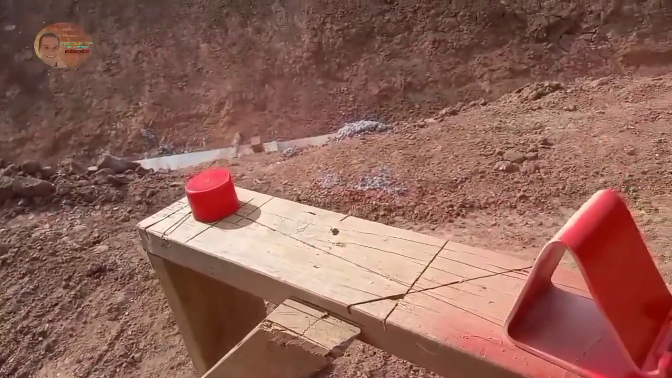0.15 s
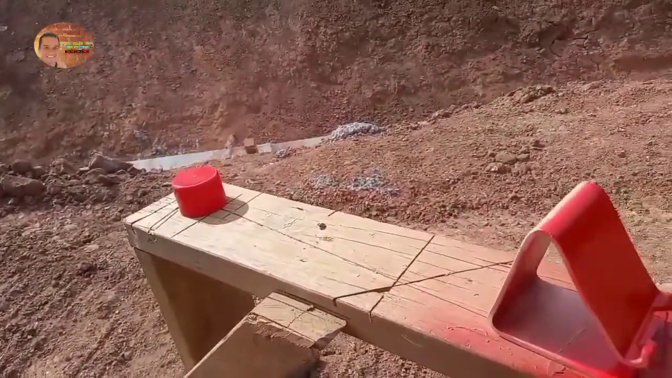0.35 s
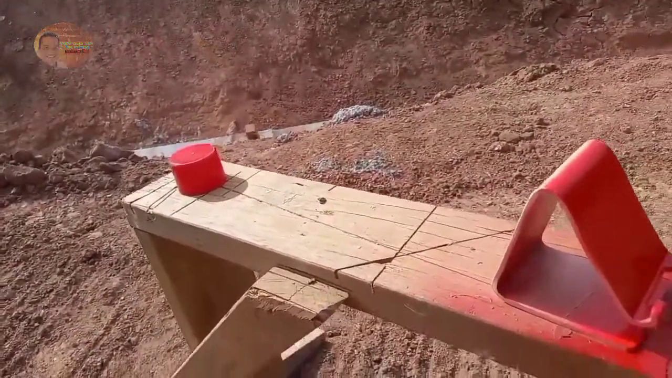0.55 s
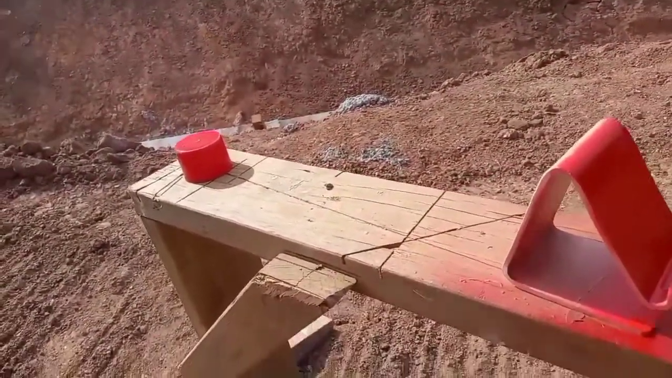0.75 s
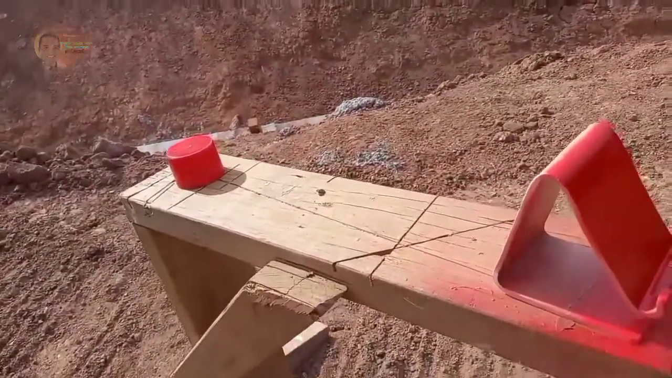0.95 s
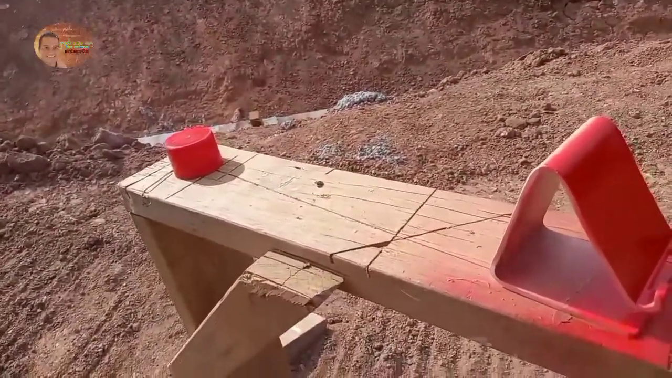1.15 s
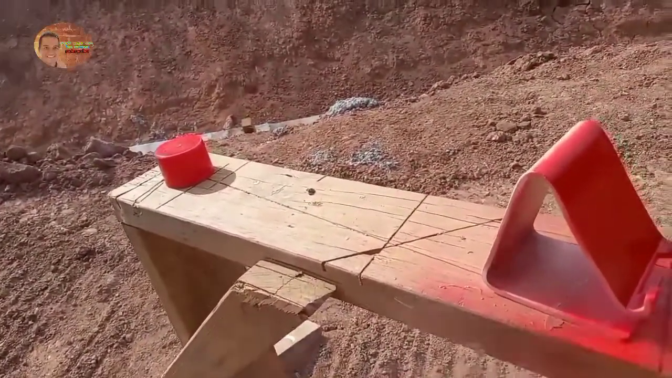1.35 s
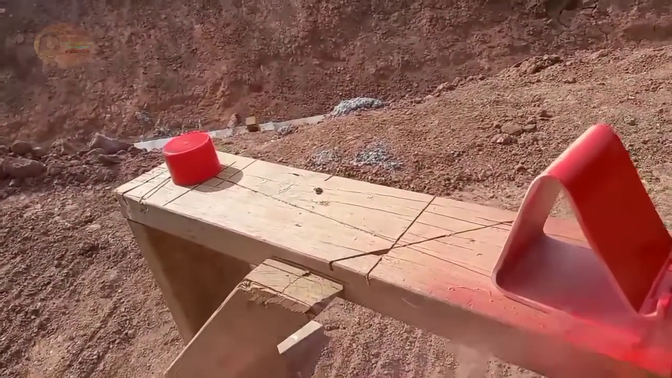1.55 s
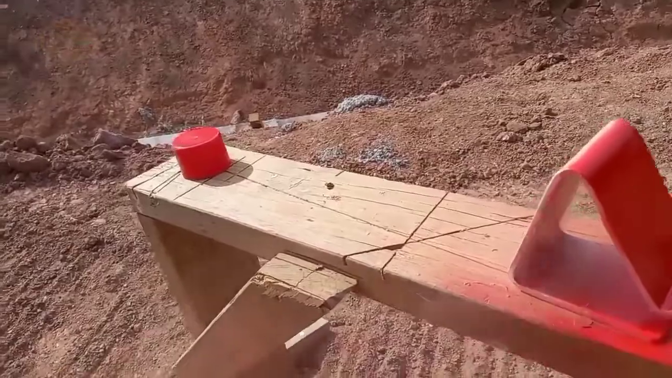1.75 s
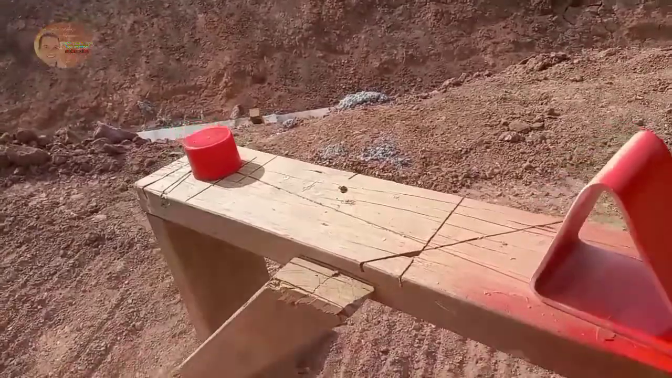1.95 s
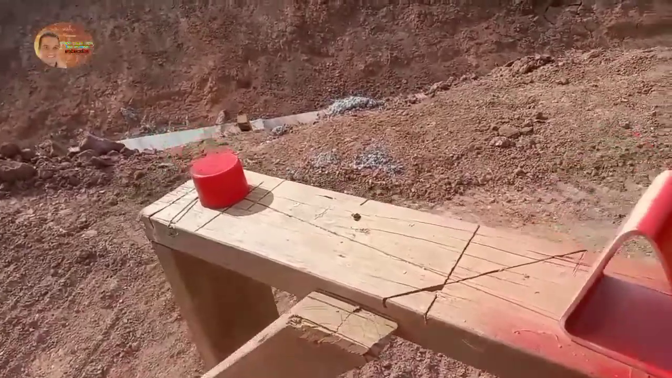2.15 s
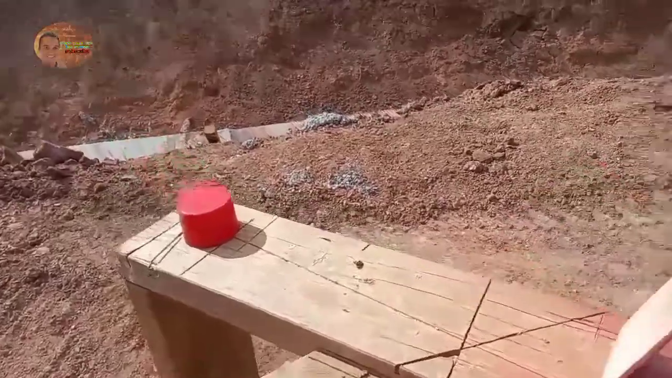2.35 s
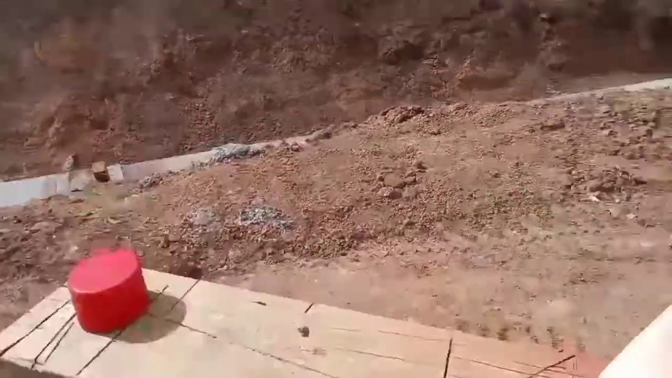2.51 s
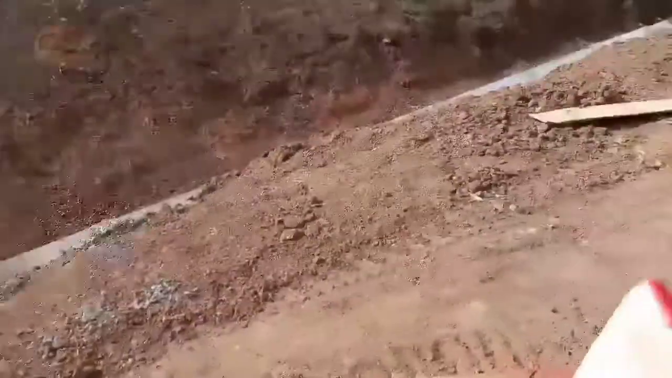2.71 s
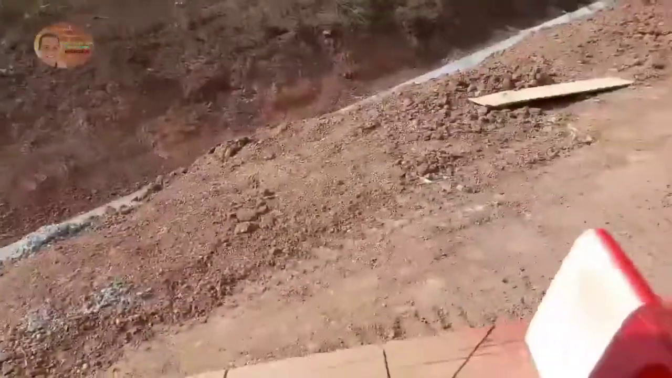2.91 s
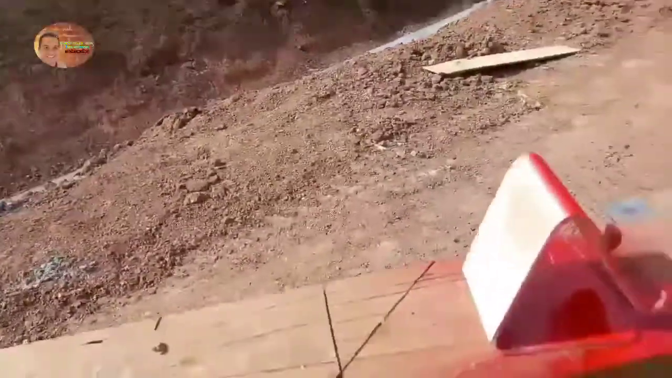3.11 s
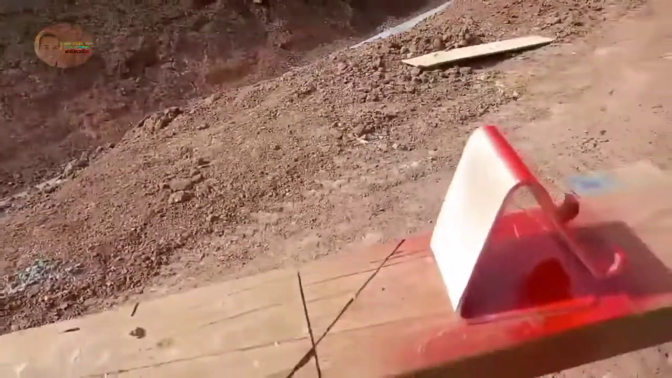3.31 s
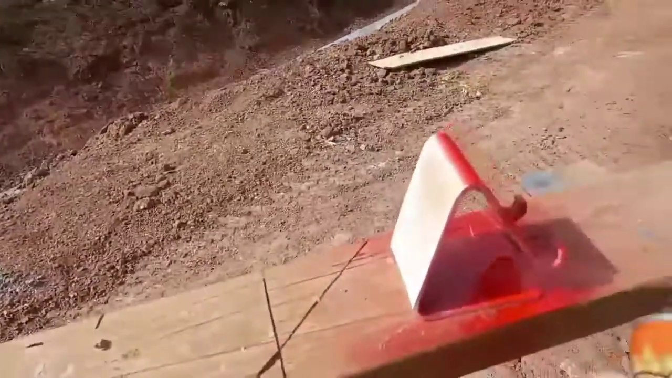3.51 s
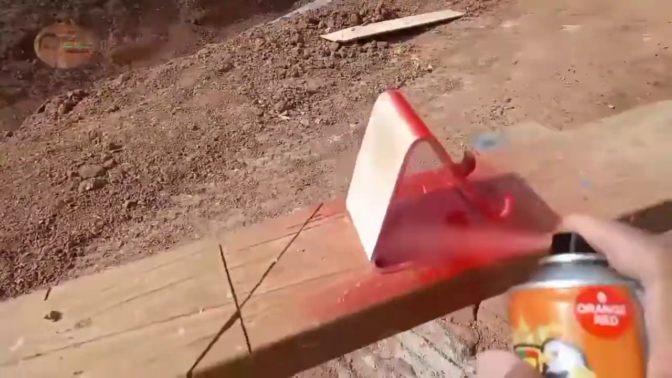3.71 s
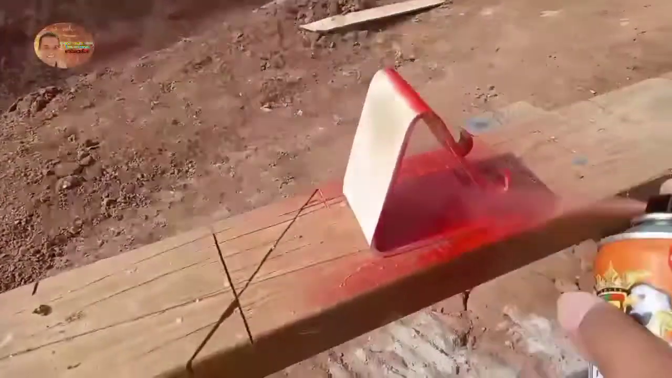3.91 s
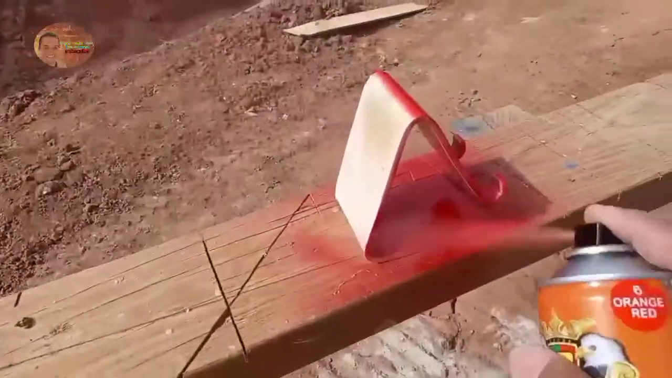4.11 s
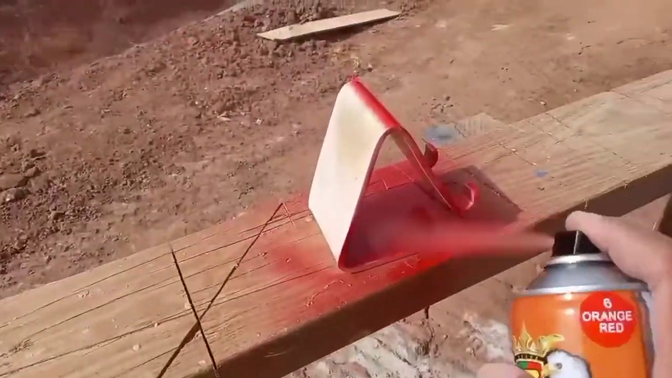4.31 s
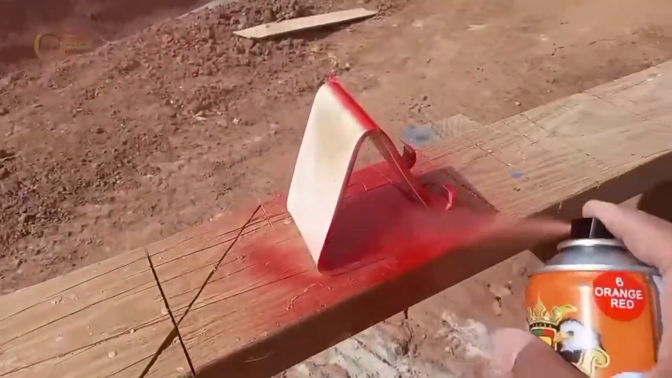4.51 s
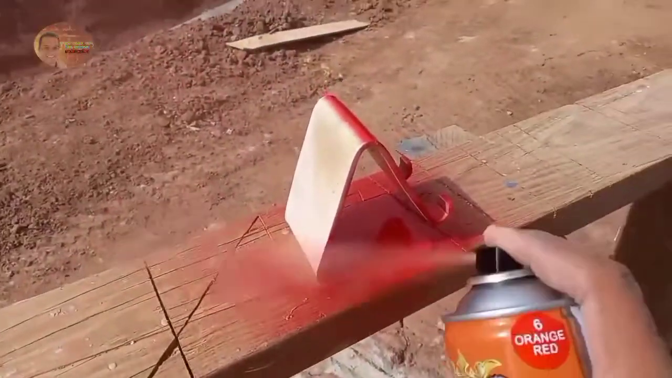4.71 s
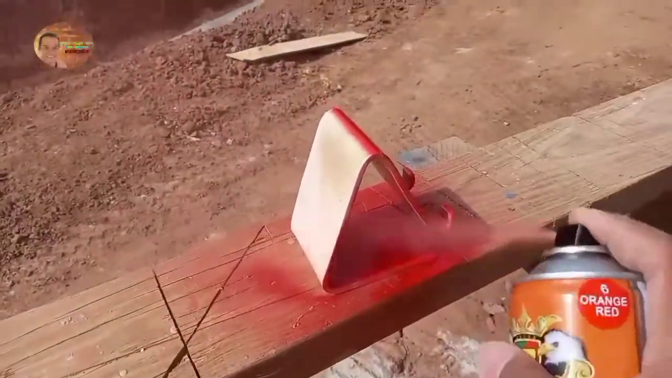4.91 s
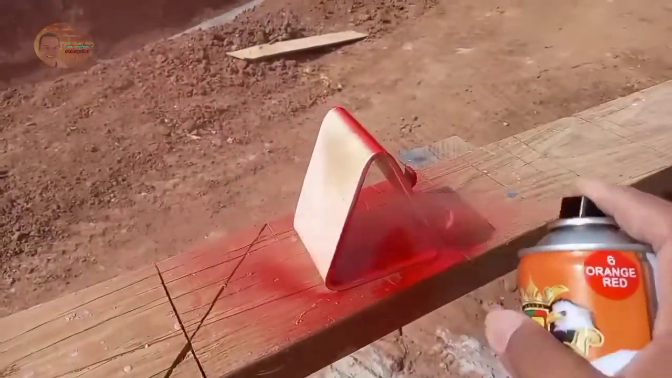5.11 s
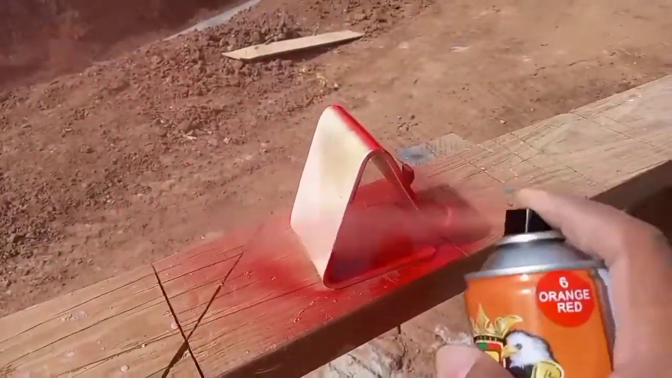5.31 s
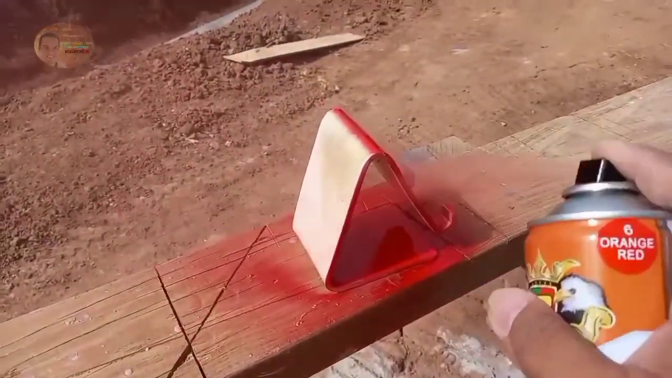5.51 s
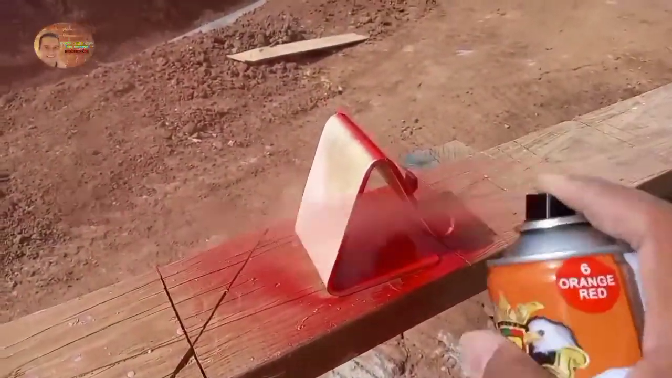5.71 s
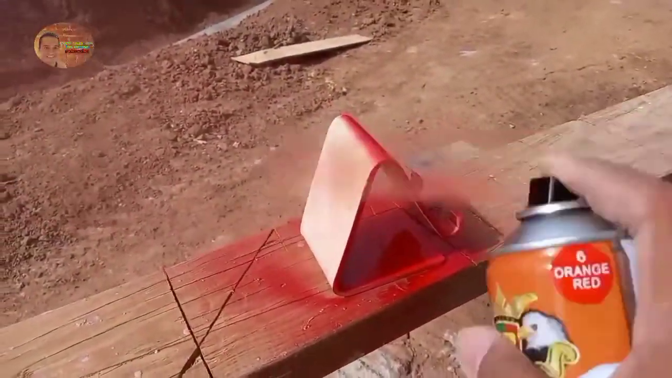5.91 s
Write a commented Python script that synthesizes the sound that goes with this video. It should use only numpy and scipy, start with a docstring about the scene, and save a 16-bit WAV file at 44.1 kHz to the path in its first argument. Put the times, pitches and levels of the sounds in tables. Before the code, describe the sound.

An aerosol can hisses, stops while its mixing ball rattles and wind bumps the microphone, then hisses again in rhythmic sweeps outdoors.

```python
"""An aerosol can hisses over a bent metal piece on a plank outdoors, stops, and sprays again from a new side.
The hiss is shaped noise at the nozzle; a second, lower noise is the jet rushing on the piece.
The mixing ball strikes ringing modes of the can wall, and bending sines make the paint glug.
Crumbling noise is the painter stepping round on dry soil, mostly between the passes.
Wind bumps the two microphones of a hand-held camera, over a faint open-air background."""
import sys
import numpy as np
from scipy import signal
from scipy.fft import rfft, irfft, next_fast_len
from scipy.io import wavfile
from scipy.ndimage import uniform_filter1d, map_coordinates

SR = 44100
rng = np.random.default_rng(int(sys.argv[2]) if len(sys.argv) > 2 else 0)


def int16_out(signal):
    """Quantize to a 16-bit WAV file."""
    q = np.round(np.clip(np.atleast_2d(signal).T, -1, 1) * 32767)
    wavfile.write(sys.argv[1], SR, q.astype(np.int16))


N = 262836

# Colour of the nozzle hiss. Each row: frequency in Hz, relative density in dB per Hz.
NOZZLE_COLOUR = [(1500, -23), (3000, -11.5), (5000, -3.5), (8000, 0.5), (10500, 1.5), (12000, 3),
                 (14000, 3), (15300, 3.5)]
# Colour of the jet on the piece, one list for each pass. Each row: frequency in Hz, relative density in dB per Hz.
SPLASH_COLOURS = [
    [(150, -20), (400, -10.5), (800, -10), (1000, -16), (1400, -8), (1800, -11), (2250, -4), (2800, -7.5),
     (3300, -13), (6000, -9.5), (9000, -13.5)],
    [(150, -15.5), (350, -5), (800, -2.5), (1050, -4), (1400, -0.5), (2500, 3), (2900, -2), (4500, -0.5),
     (6500, -4), (9000, -27.5)],
]
# The camera body shades the nozzle's treble, one list for each pass. Each row: frequency in Hz, L-R in dB.
CAMERA_SHADE = [
    [(3000, 3.5), (9000, 0), (11500, -3.5), (13200, -7), (15200, -3)],
    [(3000, 2.5), (10500, -2), (12500, 3), (14000, 1), (15300, -6)],
]
# The valve is held open. Each row: opens in seconds, shuts in seconds, nozzle level in dB at first and at last,
# level of the jet on the piece in dB at first and at last, nozzle L-R in dB, jet L-R in dB.
PASSES = [(0.63, 1.861, -31.5, -32.5, -41, -40.5, -0.5, -6.5),
          (3.468, 6.198, -34, -31, -42.5, -39, 1.5, -2.5)]
# At each turn of the hand the jet leaves the piece and the can swings aside.
# Each row: time in seconds, half length in seconds, loss of the jet in dB, swing L-R in dB.
HAND_TURNS = [(1.165, 0.078, 8, -1.5), (1.52, 0.07, 5.5, -3.5), (1.743, 0.036, 6, -3.5),
              (3.766, 0.045, 4.5, 0.5), (4.053, 0.042, 7, 1), (4.38, 0.05, 7, 1), (4.718, 0.051, 9.5, 0),
              (5.031, 0.07, 7, 3.5), (5.346, 0.039, 6.5, 3.5), (5.652, 0.032, 10, 0)]
# The valve whistles as it shuts. Each row: time in seconds, pitch in Hz, peak level in dB.
VALVE_SQUEAK = [(1.893, 15600, -75), (1.9, 14000, -66), (1.91, 11500, -71), (1.922, 9300, -84)]
# Where the can is at each end of a sweep or step. Each row: time in seconds, lag of the left microphone in ms.
LEFT_LAG = [(0, 0.43), (0.625, 0.313), (0.87, 0.275), (1.07, 0.324), (1.25, 0.269), (1.435, 0.319),
            (1.57, 0.272), (1.725, 0.319), (1.9, 0.274), (2.85, 0.27), (3.05, 0.13), (3.55, 0.192),
            (3.765, 0.088), (3.94, 0.168), (4.085, 0.086), (4.245, 0.154), (4.4, 0.048), (4.56, 0.111),
            (4.715, 0.004), (4.885, 0.122), (5.035, 0.026), (5.2, 0.122), (5.335, 0.04), (5.505, 0.113),
            (5.655, 0.008), (5.83, 0.086), (6.0, 0.036)]
# Stereo match before the lag. Each row: frequency in Hz, left-right likeness (1 is identical).
LIKENESS = [(100, 1), (600, 0.42), (1500, 0.84), (2300, 0.5), (3500, 0.98), (6000, 0.7), (8500, 1),
            (12000, 0.34), (15000, 0.55)]
# Blows of the mixing ball. Each row: time in seconds, level in dB over 5 ms of the modes at 3-5.3 kHz,
# then in dB against it the modes under 1.7 kHz, at 1.7-3 kHz, at 5.3-8 kHz, above 8 kHz; last, L-R in dB.
BALL_KNOCKS = [(0.1354, -61.5, -23, -9, 6, -3, -10.5), (0.2123, -68.5, -11.0, -8, 4, -4, -8.0),
               (1.2061, -41, -2.5, 5, -11, -5, -5), (1.208, -39, -2.5, -1.5, 3, 3, -10.5),
               (1.231, -46, -2, 2, 7, 8, -2.0), (1.2414, -48, -7, -6.0, 3, 5.0, -16),
               (1.2751, -37.5, -14, -13, 0, 2, -20), (1.2856, -30, -10, -5, 0, -4, -13),
               (1.2886, -30.5, 2, 1, 5, 5, -2.5), (1.2928, -50, -15, -13, 12, 8, 22),
               (1.6215, -33.5, 8.5, -3, -5, -14, -6), (1.624, -26, -18, -4, 2, 2.5, -5),
               (1.635, -30.5, -11, -6, 6, 2, -5), (1.6383, -39, -15.0, -2, 8, -4, -2),
               (1.6463, -36, 1, -8, -6, 5, -3), (1.709, -58, 17.5, 0, 0, 0, -8),
               (1.742, -63, 12, 0, 0, 0, -6), (1.771, -55.5, 21, 2, 0, 0, 2),
               (1.794, -68, 21, -5, -2, 0, -14), (2.2838, -68.5, 2, -3, 11, -6.0, 11),
               (2.344, -38, -2, -1.5, -1, -6, -4.5), (2.3854, -52.5, 6, 2, 0, -9, -13),
               (2.4149, -51, -4, 2.5, -1, -5, -8), (2.441, -53.5, -17, 4, 0, -12, -9),
               (2.4455, -48, -8.0, -7, -3.0, -15, -2), (2.455, -59, -12, 2, -4, -12, -11),
               (2.4996, -27, -21, -10, 1.5, -6, -9.5), (2.5038, -42.5, -15, 1, 5, -4, -21.5),
               (2.535, -49.5, 5, 2, -5, 1, -10), (2.563, -59.5, 5, 7.5, -1, -1, -16),
               (2.5845, -50, 2, -5, -7.0, -12.0, -6.0), (2.589, -48.5, -13, -0.5, 5.5, 1.5, -12),
               (2.65, -51.5, -15, -16, -1.0, -3, -14), (2.7346, -37.5, -1.5, -8, 11, 1.5, -12),
               (2.7601, -56.0, -17, -19.0, -3.0, -2, -5.0), (2.8136, -42.5, -2, -5, -4.0, -2, -4),
               (2.8158, -37.5, -10, -12, -1, -3, -9.5), (2.8765, -32, -9, -8, 7.5, 1.5, -9),
               (2.8779, -40.5, -3, -8, 12.5, -4.0, 8), (2.896, -51.0, 2, -1, 0, 8, -8.0),
               (2.92, -51, -12, -5, 2, 4, -3), (2.925, -49, 1, 11, -7.0, 0, -1),
               (2.931, -43.5, -13.0, -12, 4, 1, -8), (3.0115, -42, -15, -2, 1.5, -2, -2),
               (3.031, -57, -14, -6, -1, -8, 9), (3.037, -70, 20, 19, -5.0, -5.0, -3),
               (3.081, -76, 10, 8, -2, -5, -3), (3.102, -38.5, -9, -15, 11, -6, -6),
               (3.115, -60, 5, 5, -8, -8, 8), (3.1172, -39.5, -16, -9, 1, -4, -4),
               (3.1395, -51, 2, -7, -7, 0, -7), (3.148, -43, -21, -22, 3.5, -6, -4),
               (3.1588, -49, -3, -4, 0, -6, -2), (3.1746, -39, -23, -12, 1, -6, -3),
               (3.1908, -51, -9, -1, -14.0, -8.0, -1), (3.196, -47.0, -19, -4, -1, 0, -11),
               (3.2034, -45.5, -24, -6, 3, 4, -4), (3.2188, -55, -1, -5, -4, -6, -12),
               (3.231, -49.5, -20, -4, 1, -9.0, 1), (3.2384, -56, -11, -6, 2, -8, 0),
               (3.2475, -58, -3, -5, -3, -6, -1), (3.2753, -54, -16.0, -8, 4, -11.0, 4),
               (3.339, -51.5, -7.5, -1, 10.5, 0, -4), (3.3514, -58, 9, 0.5, -11, -8.0, -16),
               (3.366, -58.5, 5, 2, -8.0, 0.0, 16), (3.401, -57, -4, -2, -2, -5.0, 18),
               (3.41, -59, -16, 6, -5, 5, -6), (4.0484, -40.5, -6, -7, 0, -5, -7),
               (4.4309, -37, -11, -12, -1, -15, 0.0), (4.9977, -32.5, -20, -7.5, -0.5, -3, 4),
               (5.0377, -33.5, -11, -2, -5, 2, -1), (5.2085, -29.5, -32, -9, -4.5, -7, 2.5),
               (5.3411, -30.5, -5, -3, 3, 3, 1), (5.529, -28.5, -14, -9, 1.5, -5, -2),
               (5.6552, -31, -8.5, -2, 6.5, 1.5, 0.0), (5.8919, -37, -6.5, -1, 2.5, -11, 0.0)]
# Modes of the paint-damped can wall, in the groups above. Each row: centre in Hz, width in Hz, relative level in dB.
CAN_MODES = [
    [(3900, 1340, 1), (5090, 800, 2)],
    [(850, 79, 2), (1246, 113, 2), (1610, 410, 3)],
    [(2035, 320, 6), (2680, 650, 7)],
    [(5580, 280, 4), (6970, 1240, 3.5)],
    [(9840, 1600, -1.5), (12700, 1400, -5.5), (13600, 4500, -15)],
]
# Paint bubbles in the tipping can. Each row: start in seconds, length in seconds, first, middle and last pitch
# in Hz, level in dB at the middle.
PAINT_GLUGS = [(1.51, .03, 1230, 1330, 1240, -55), (1.768, .062, 1400, 1130, 1320, -50),
               (1.95, .035, 1330, 1300, 1340, -62)]
# A sole shifts on the soil. Each row: start in seconds, length in seconds, low level in dB, grit level in dB.
SOLE_SCUFFS = [(0, 0.021, -65, -58.5), (1.495, .035, -47, -80), (1.732, 0.11, -46.5, -80),
               (1.88, 0.093, -54, -75), (2.004, 0.051, -68.5, -84), (2.142, 0.12, -61, -86),
               (2.326, 0.063, -49.5, -54.5), (2.434, 0.059, -56, -62), (2.509, 0.16, -56.5, -59.5),
               (2.723, 0.12, -54.5, -62), (2.934, 0.017, -40.5, -46), (2.966, 0.012, -43, -47),
               (3.002, 0.005, -69, -64), (3.026, 0.014, -68, -73), (3.11, 0.17, -61, -59.5),
               (3.345, 0.028, -58.5, -55), (3.387, 0.04, -60.5, -55.5), (3.46, 0.035, -57, -59),
               (3.489, 0.15, -52.5, -50)]
# Colour of the low band of a scuff. Each row: frequency in Hz, relative density in dB per Hz.
SOLE_COLOUR = [(150, -22), (350, -12), (600, -11), (810, -1), (1030, -10), (1380, 0), (1600, -3),
               (1850, -13), (2150, -8), (2600, -15), (4000, -27)]
# The breeze on the ports. Each row: time in seconds, buffet level in dB, L-R in dB.
BREEZE = [(0, -66, -1), (.3, -68, -1), (.85, -60, -1), (1.4, -58, 0.5), (1.55, -56, -31), (1.66, -40, -10),
          (1.72, -37, -7), (1.8, -34.5, -6), (1.85, -33.5, 8), (1.95, -35, -2), (2.1, -41, -6),
          (2.18, -48.5, -6), (2.28, -34, -6), (2.42, -40, 3), (2.55, -32, -5), (2.68, -42, 0),
          (2.88, -63.5, 1), (3.25, -65, -2), (4.55, -60.5, 2.5), (4.72, -45, -7), (4.95, -61, -2),
          (5.45, -62, 0), (5.72, -53.5, -13), (5.8, -53, -23), (5.96, -58, -12)]
# Colour of the buffeting. Each row: frequency in Hz, relative density in dB per Hz.
RUMBLE_COLOUR = [(20, -49), (40, -2), (60, -2.5), (72, 14), (90, 6.5), (115, -3.5), (150, -2), (220, -60)]
# Colour of the wind's flutter. Each row: frequency in Hz, relative density in dB per Hz.
FLUTTER_COLOUR = [(90, -41), (140, 7), (260, -3), (400, -14.5), (700, -34), (1200, -58)]
# Eddies on the ports. Each row: time in seconds, rumble level in dB, L-R in dB, slap against the rumble in dB.
EDDY_BUMPS = [(1.229, -46, -3, -38), (1.527, -40, -19, -30), (1.566, -34.5, -20, -30), (1.612, -40, 0, -30),
              (1.7, -40, -22, -28), (1.745, -26.5, 7, -27), (1.773, -24, -3, -23), (1.789, -32, 2, -32),
              (1.816, -28.5, 5, -27), (1.846, -45, 8, -30), (1.874, -28, 20, -16), (1.891, -36, -14, -30),
              (1.911, -30, 12.5, -31), (1.932, -32.5, -19, -28), (1.949, -36, 12, -30),
              (1.973, -31.5, -10, -30), (2.002, -30, 7, -33), (2.022, -38.5, -19, -30),
              (2.063, -32, -11, -18), (2.095, -27, 1, -35), (2.132, -37.5, 8, -30), (2.18, -41, -2, -34),
              (2.221, -38, -21, -20), (2.238, -32, 13, -14), (2.269, -35.5, -10, -30),
              (2.307, -41, 14, -20), (2.369, -34, 16, -4), (2.421, -40, -12, -30), (2.46, -29.5, 17, -28),
              (2.5, -31, 5, -30), (2.511, -30.5, -11, -28), (2.525, -32, 19, -2), (2.553, -30.5, 14.5, 8),
              (2.58, -33.5, -12, 2), (2.635, -32.5, -17, -28), (2.697, -41.5, 22, -32),
              (2.743, -45, -16, -30), (2.806, -50, -18, -30), (2.97, -57, 6, -30), (3.104, -54.5, 20, -30),
              (4.698, -45, -16, -30), (4.741, -46.5, 18.5, -33), (4.815, -46.5, -17, -30),
              (5.536, -53.5, -29, -30), (5.642, -47, -16, -30), (5.771, -52, -32, -30),
              (5.799, -48, -32, -30), (5.832, -42, -32, -7), (5.877, -57.5, -44.5, -30),
              (5.96, -45.5, -20, -28)]
# The range from which each bump draws its pace: slowest in Hz, fastest in Hz.
BUMP_PACE_HZ = (68.7, 100.3)
# The open-air background. Each row: time in seconds, level in dB.
AIR_LEVEL = [(0, -66.5), (.6, -67), (1.9, -61.5), (2.25, -60.5), (3.07, -61.5), (3.3, -67), (5.96, -60)]
# Colour of the open air. Each row: frequency in Hz, relative density in dB per Hz.
AIR_COLOUR = [(100, -6), (250, 8), (600, 2.5), (1000, -5.5), (3000, -3.5), (4500, 0), (7000, 1.5),
              (10000, -6), (13000, -14), (15500, -4)]
# Resonance of the microphone ports. Each row: frequency in Hz, gain in dB.
PORT_GAIN = [(2400, 2.5), (3000, 3.5), (3600, 3), (5500, -0.5), (6800, 2), (7400, -4.5), (9000, -3),
             (11000, 0)]

OPEN_S, SHUT_S = 0.035, 0.033  # valve travel
BUILD_S, BUILD_DB = 0.031, 15.5  # pressure builds up as the valve opens
SAG_S, SAG_DB = 0.033, 6.5  # pressure sags as the finger lifts
JET_BUILDS = 2.5  # the jet feels a change of pressure this many times more than the nozzle, in dB
TURN_NEAR_DB, JET_SWING = 1.5, 0.25  # nozzle gain at a turn, share of the swing in the jet
TOUCH_S = 0.0004  # the ball takes about this long to press into the paint
RATTLE_DB, RATTLE_S = -24, 0.014  # the chatter common to both sides: first level, and time to fall 60 dB
SIDE_CHATTER = 1.6  # chatter of each side alone, times the common part
MODE_SCATTER_DB, MODE_SCATTER_HZ_SHARE = 2, .03  # each knock finds the paint lying elsewhere
STEP_RISE_DB_S, STEP_FALL_DB_S = 697, 403  # dB per second
BUMP_RISE_S, BUMP_FALL_S = 0.01, 0.019
LOW_CUT_HZ, TOP_HZ = 35, 15480


def amp(db):
    """dB to gain."""
    return 10 ** (np.asarray(db) / 20)


def unit(x):
    """Scaled to rms 1."""
    return x / np.sqrt(np.mean(x ** 2) + 1e-20)


def along(points, hz):
    """Read a (Hz, value) curve on a log frequency axis."""
    f, v = np.transpose(points)
    return np.interp(np.log(hz + 1), np.log(f + 1), v)


def curves(rows):
    """One value per sample for each column after the time."""
    s, *cols = np.transpose(rows)
    return [np.interp(np.arange(N) / SR, s, c) for c in cols]


def sounding(rows, fade):
    """1 inside the time span of a table, fading to 0 at its ends."""
    t = np.arange(N) / SR
    return np.clip(np.minimum(t - rows[0][0], rows[-1][0] + fade - t) / fade, 0, 1)


def sides(pan_db):
    """Left and right gains for a given L-R in dB."""
    return amp(np.array([pan_db, -pan_db]) / 2)


def wobble(rate):
    """A smooth random curve, rate knots a second."""
    knots = rng.standard_normal(int(N * rate / SR) + 4)
    return map_coordinates(knots, [np.arange(N) * rate / SR])


def filtered(x, response):
    """x shaped by a response of frequency."""
    m = next_fast_len(N + SR // 2)
    return irfft(rfft(x, m) * response(np.fft.rfftfreq(m, 1 / SR)), m)[..., :N]


def pair(x, likeness):
    """Two unrelated signals mixed into a left and a right of the given likeness."""
    def mid_side_gains(hz):
        turn = np.arccos(np.clip(along(likeness, hz), -1, 1)) / 2
        return np.array([np.cos(turn), np.sin(turn)])

    mid, side = filtered(x, mid_side_gains)
    return np.array([mid + side, mid - side])


def rush(spectrum, likeness, patchy_db):
    """Stereo noise of rms 1 with patches of random gain in time and frequency."""
    z = signal.stft(rng.standard_normal((2, N)), nperseg=512)[2]
    field = uniform_filter1d(rng.standard_normal(z.shape[1:]), 6, 0)
    field = uniform_filter1d(field, 10, 1)
    noise = signal.istft(z * amp(patchy_db * unit(field)), nperseg=512)[1][:, :N]
    coloured = filtered(noise, lambda hz: amp(along(spectrum, hz)))
    return unit(pair(coloured, likeness))


def spray():
    """Gas hisses at the nozzle, the jet rushes where it meets the piece, and paint droplets make both sputter."""
    t = np.arange(N) / SR
    sputter = amp(0.5 * wobble(300))
    nozzle = sputter * amp(.5 * wobble(7)) * rush(NOZZLE_COLOUR, LIKENESS, patchy_db=1.8)
    nozzle = off_plank(nozzle, ms=.7, drift_ms=.07, share=.16)
    turning = [np.exp(-((t - s) / half) ** 2) for s, half, loss_db, swing_db in HAND_TURNS]
    lost_db, swing_db = np.transpose(HAND_TURNS)[2:] @ turning
    near_db = TURN_NEAR_DB * sum(turning)
    out = 0
    for spray_pass, shade, colour in zip(PASSES, CAMERA_SHADE, SPLASH_COLOURS):
        opens, shuts, *ends_db, nozzle_pan, splash_pan = spray_pass
        valve = np.clip(np.minimum((t - opens) / OPEN_S, 1 + (shuts - t) / SHUT_S), 0, 1) ** 2
        pressure_db = -BUILD_DB * np.exp(-np.abs(t - opens) / BUILD_S)
        pressure_db = pressure_db - SAG_DB * np.exp(-np.abs(t - shuts) / SAG_S)
        nozzle_db = pressure_db + np.interp(t, [opens, shuts], ends_db[:2])
        splash_db = JET_BUILDS * pressure_db + np.interp(t, [opens, shuts], ends_db[2:])

        shaded = filtered(nozzle, lambda hz: sides(along(shade, hz)))
        hiss = amp(nozzle_db + near_db) * sides(nozzle_pan + swing_db) * shaded
        patter = sputter * amp(1.0 * wobble(60) + .6 * wobble(9))
        splash = patter * rush(colour, LIKENESS, patchy_db=1.2)
        splash = amp(splash_db - lost_db) * sides(splash_pan + JET_SWING * swing_db) * splash
        out = out + valve * (hiss + splash)
    return out


def off_plank(x, ms, drift_ms, share):
    """The plank returns a copy; as the hand moves, its delay drifts and combs wander through the hiss."""
    hz, t, z = signal.stft(x, SR, nperseg=512)
    frames = np.clip(t * SR, 0, N - 1).astype(int)
    delay = np.array([ms + drift_ms * wobble(3.3) for channel in x])[:, frames] / 1000
    reflected = share * np.minimum(hz[:, None] / 9000, 1)  # the treble bounces best
    comb = 1 + reflected * np.exp(-2j * np.pi * hz[:, None] * delay[:, None])
    return signal.istft(z * comb, SR, nperseg=512)[1][:, :N]


def squeak():
    """The last gas of the first pass leaves the closing valve in a faint falling whistle."""
    hz, db = curves(VALVE_SQUEAK)
    whistle = np.sin(2 * np.pi * np.cumsum(hz) / SR)
    return sounding(VALVE_SQUEAK, fade=.003) * amp(db) * whistle * sides(-1)[:, None]


def wall_ring(crack, modes, f, t):
    """A blow rings one group of damped wall modes, each a resonance slightly moved by the paint."""
    wall = 0
    for k, (centre, width, level) in enumerate(modes):
        c = centre * rng.normal(1, MODE_SCATTER_HZ_SHARE)
        gain = amp(level + rng.normal(0, MODE_SCATTER_DB))
        wall = wall + (-1) ** k * gain * 1j * f * width / (c * c - f * f + 1j * f * width)
    below, above = np.minimum(f / modes[0][0], 1), np.minimum(modes[-1][0] / (f + 1), 1)
    touch = 1 - np.exp(-t / TOUCH_S)
    fade = np.cos(np.pi / 2 * t / t[-1])
    ring = irfft(crack * wall * below * above) * touch * fade
    # each side carries the energy of rms 1 over 5 ms
    return ring / np.linalg.norm(ring, axis=1, keepdims=True) * np.sqrt(SR / 200)


def knocks():
    """The mixing ball knocks the can wall: one sharp blow and a short chatter ring the damped modes."""
    out, t = np.zeros((2, N + SR)), np.arange(2048) / SR
    f = np.fft.rfftfreq(len(t), 1 / SR)
    for s, db, *against_db, pan in BALL_KNOCKS:
        both, left, right = rng.standard_normal((3, len(t))) * amp(RATTLE_DB - 60 * t / RATTLE_S)
        # each microphone hears the can from its own side
        crack = rfft((t == 0) + both + SIDE_CHATTER * np.array([left, right]))
        at = round(s * SR)
        for modes, group_db in zip(CAN_MODES, [0, *against_db]):
            ring = wall_ring(crack, modes, f, t)
            out[:, at:at + len(t)] += amp(db + group_db) * sides(pan)[:, None] * ring
    return out[:, :N]


def glugs():
    """Paint bubbles in the tipping can are short sines that swell, bend and fade."""
    out = np.zeros(N)
    for s, length, *bend_hz, db in PAINT_GLUGS:
        u = np.linspace(0, 1, round(length * SR))
        hz = np.polyval(np.polyfit([0, .5, 1], bend_hz, 2), u)
        swell = np.sqrt(2 * np.sin(np.pi * u))
        out[round(s * SR):][:len(u)] += amp(db) * swell * np.sin(2 * np.pi * np.cumsum(hz) / SR)
    return sides(-6)[:, None] * out


def scuff():
    """Soil crumbles under the sole: lumpy noise in a low and a gritty band."""
    t = np.arange(N) / SR
    weight = []
    for s, length, *db in SOLE_SCUFFS:
        rise_db = STEP_RISE_DB_S * np.maximum(s - t, 0)
        fall_db = STEP_FALL_DB_S * np.maximum(t - s - length, 0)
        weight.append(amp(-rise_db - fall_db))
    low_gain, grit_gain = amp(np.transpose(SOLE_SCUFFS)[2:]) @ weight
    grains = amp(3.5 * wobble(400) + 1.3 * wobble(60))
    low = rush(SOLE_COLOUR, LIKENESS, patchy_db=2)
    grit_colour = [(1800, -20), (3500, 0), (7000, 0), (10000, -5), (16000, -12)]  # Hz, relative dB per Hz
    grit = rush(grit_colour, LIKENESS, patchy_db=1.2)
    return sides(-4.5)[:, None] * (low_gain * unit(grains * low) + grit_gain * unit(grains * grit))


def placed(x):
    """The sound reaches the right microphone first: a phase ramp, half on each side, swings with the hand."""
    hz, t, z = signal.stft(x, SR, nperseg=512, noverlap=384)
    s, ms = np.transpose(LEFT_LAG)
    rows = np.arange(len(s))
    sweep, part = np.divmod(np.interp(t, s, rows), 1)
    eased = (1 - np.cos(np.pi * part)) / 2
    lag_ms = np.interp(sweep + eased, rows, ms)
    turn = np.exp(-1j * np.pi * hz[:, None] * lag_ms / 1000)
    return signal.istft(z * [turn, turn.conj()], SR, nperseg=512, noverlap=384)[1][:, :N]


def eddy_bumps():
    """An eddy pushes the ports unequally into a few low swings, and may slap; returns bumps and their swells."""
    bumps, swells = np.zeros((2, N + SR)), np.zeros((2, N + SR))
    u = np.arange(-2000, 4000) / SR
    slap = np.exp(-(u / 0.0014) ** 2) * np.cos(2 * np.pi * 200 * u)  # a short soft push
    swell = np.exp(-(u / np.where(u < 0, BUMP_RISE_S, BUMP_FALL_S)) ** 2)
    for s, db, pan, slap_db in EDDY_BUMPS:
        pace_hz = rng.uniform(*BUMP_PACE_HZ)
        start = rng.uniform(size=(2, 1))  # each port begins anywhere in the cycle
        swing = np.sqrt(2) * np.cos(2 * np.pi * (pace_hz * u + start))
        gain = amp(db) * sides(pan)[:, None]
        at = round(s * SR) - np.sum(u < 0)
        bumps[:, at:][:, :len(u)] += gain * (swell * swing + amp(slap_db) * slap)
        swells[:, at:][:, :len(u)] += gain * swell
    return bumps[:, :N], swells[:, :N]


def wind():
    """The breeze buffets each port with rumbling noise; eddies add bumps, and a flutter follows both."""
    breeze_db, pan = curves(BREEZE)
    breeze = amp(breeze_db + 1.5 * np.array([wobble(12), wobble(12)])) * sides(pan)
    bumps, swells = eddy_bumps()
    buffet = rush(RUMBLE_COLOUR, [(60, 0.9), (300, 0.14)], patchy_db=4.5)
    power = np.abs(uniform_filter1d(buffet ** 2, size=2600))
    buffet = unit(buffet / power ** .35)  # evens out its swells
    lumps = amp(2.7 * np.array([wobble(26.06), wobble(23.27)]))
    flutter = unit(lumps * rush(FLUTTER_COLOUR, [(60, 0.22), (300, 0.18)], patchy_db=3))
    return breeze * buffet + bumps + amp(-16.5) * np.hypot(breeze, swells) * flutter


def air():
    """A faint open-air hush of shaped noise, slowly changing in level and stronger on the right."""
    hush = rush(AIR_COLOUR, [(100, .75), (300, .7), (1000, .1), (5000, .05)], patchy_db=.5)
    return amp(curves(AIR_LEVEL)[0]) * sides(-2.2)[:, None] * hush


def scene():
    """The painter's sounds set in place, with wind and open air around them."""
    painter = spray() + squeak() + knocks() + glugs() + scuff()
    return placed(painter) + wind() + air()


def record(dry):
    """The ports colour the treble, the microphones lose the deepest bass, and a steep slope ends the top."""
    coloured = filtered(dry, lambda hz: amp(along(PORT_GAIN, hz)) / (1 + (LOW_CUT_HZ / (hz + 1)) ** 4))
    # 1 dB down for every 3 Hz above the top, to 140 dB
    return filtered(coloured, lambda hz: amp(-np.clip((hz - TOP_HZ) / 3, 0, 140)))


dry = scene()
out = record(dry)
int16_out(out)
```